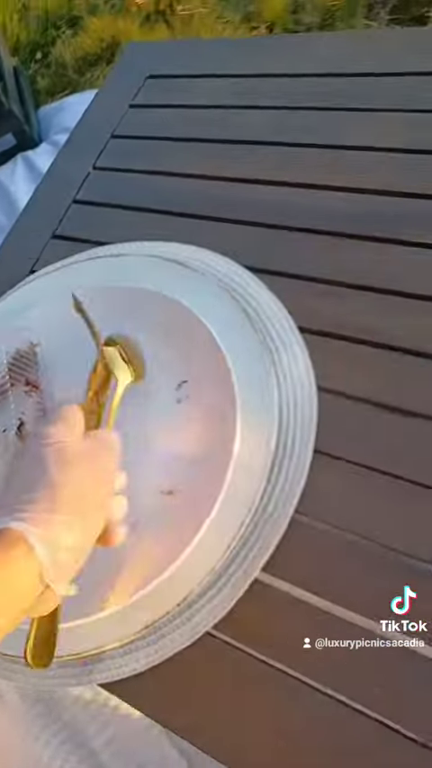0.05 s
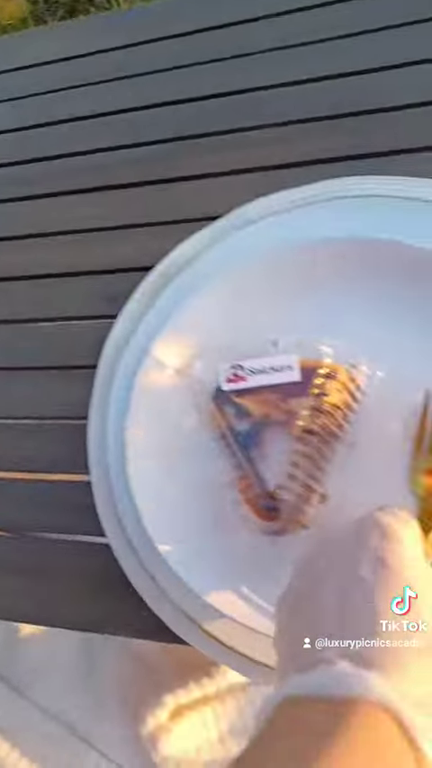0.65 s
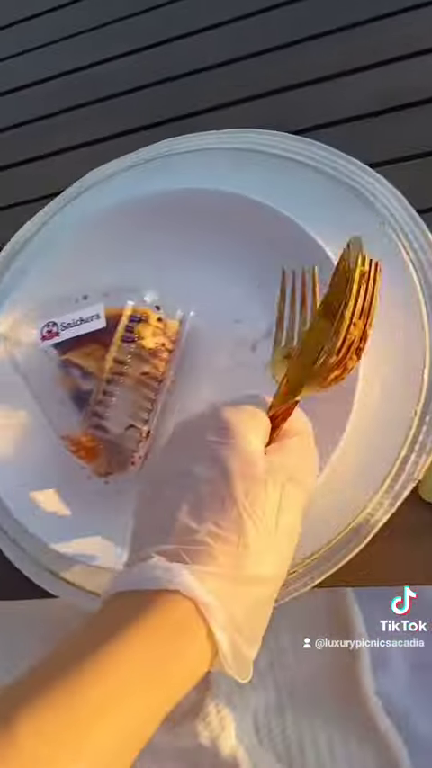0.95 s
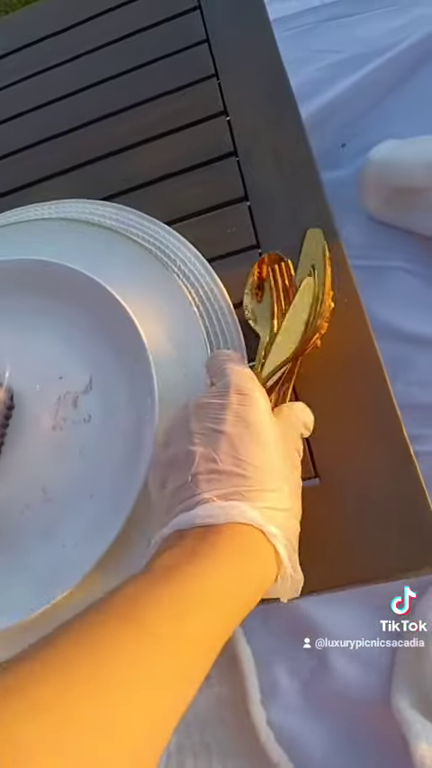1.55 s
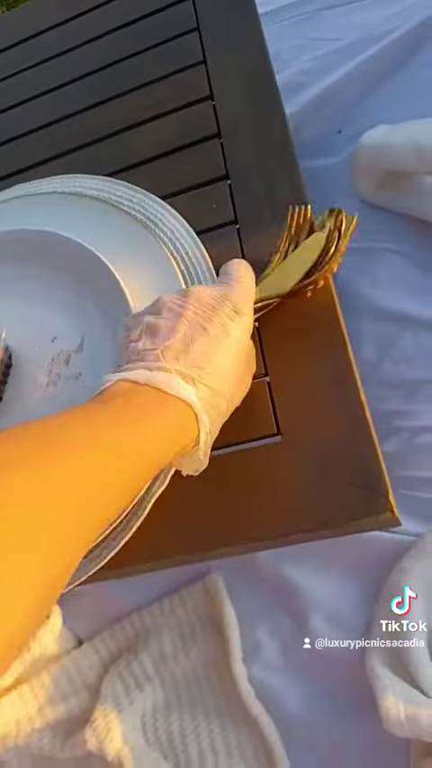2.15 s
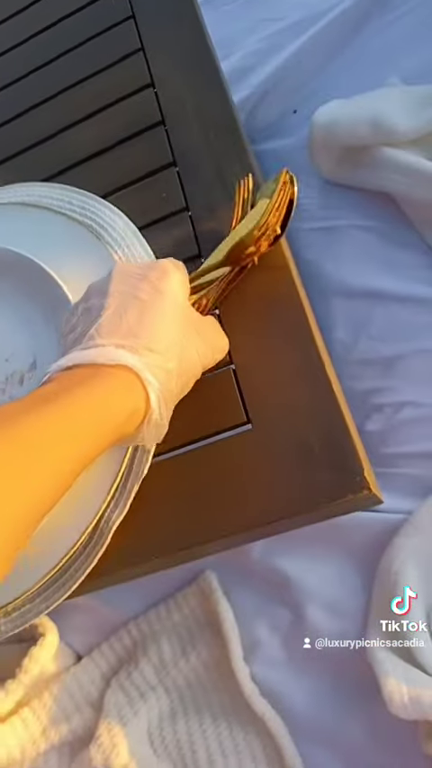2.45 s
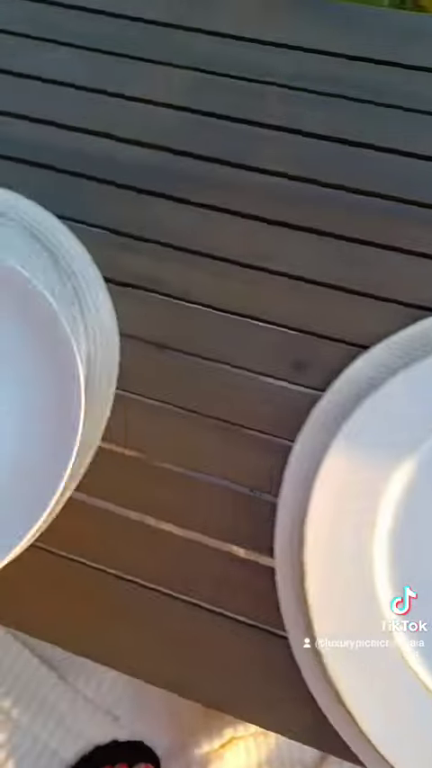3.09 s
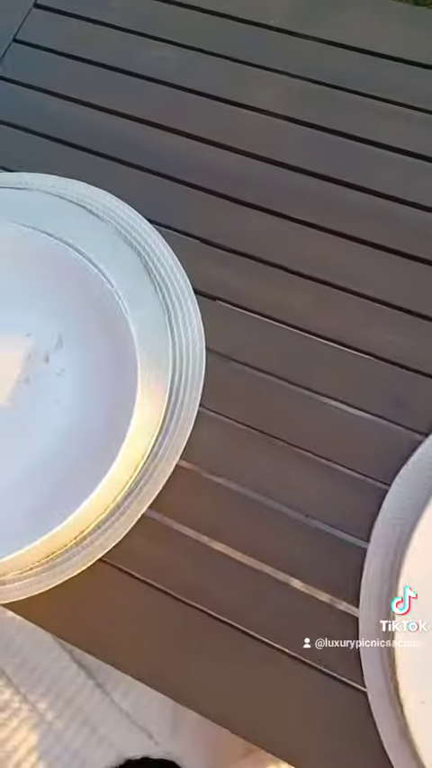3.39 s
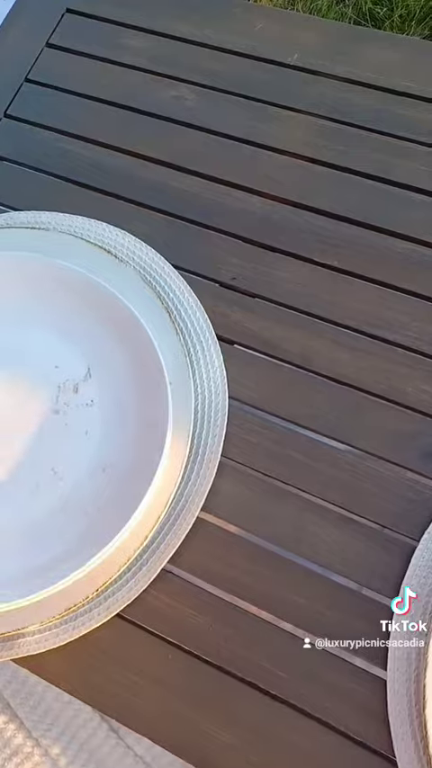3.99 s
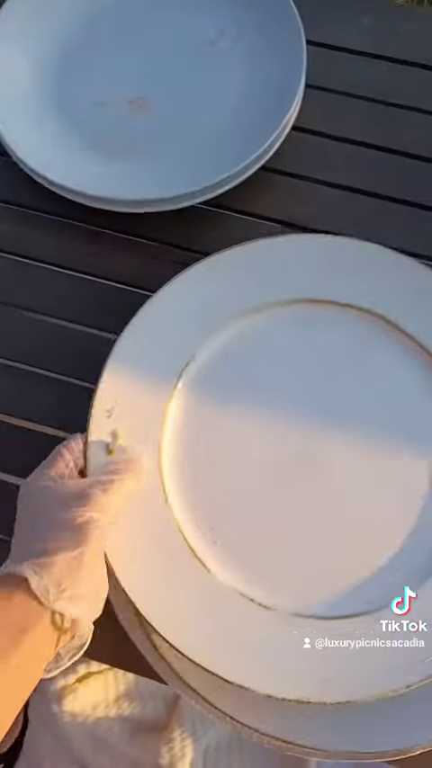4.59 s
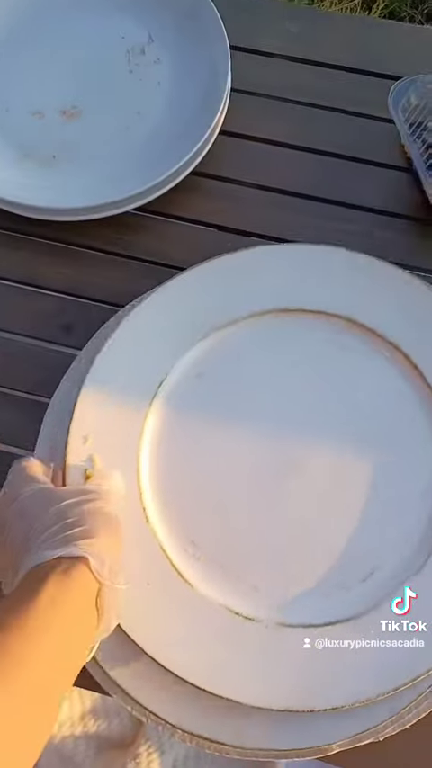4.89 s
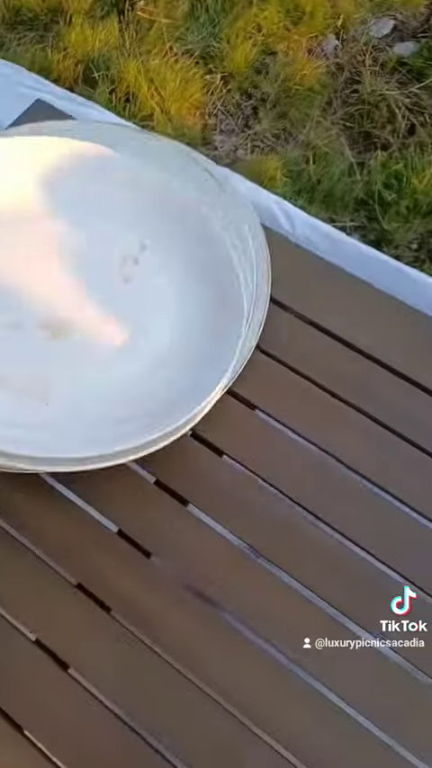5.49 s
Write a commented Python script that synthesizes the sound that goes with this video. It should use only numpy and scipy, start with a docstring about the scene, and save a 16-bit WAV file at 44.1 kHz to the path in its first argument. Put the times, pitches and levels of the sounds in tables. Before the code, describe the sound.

A brief slide and a bright fork clink open the sound, close and straight ahead, followed by small metal rattles. At about 0.7 seconds a spoon rings with a short thud from the plate and table. From 0.9 to 2.5 seconds the gathered cutlery jangles in short bursts, damped in a fist, with soft scraping over a plate, light raps and a thin knife ring near 1.5 seconds. After a short lull, china plates clatter as they are stacked from 3.2 to 3.9 seconds, loudest around 3.5, with gentle sliding. Between 4.6 and 5.1 seconds light underplates slide and knock together with a dry, hollow tone. A soft puff of wind touches the microphone at 5.2 seconds, and a last china plate lands sharply at about 5.6. The background is very quiet garden air with hardly any echo.

```python
"""A brief slide and the bright clink of a fork, close to the microphone at a garden table.
A gloved hand gathers cutlery off dinner plates: single pieces ring freely, then jangle, damped,
in the fist and scrape over a plate. China plates clatter as they are stacked, and light underplates
knock together. All of it is straight ahead, in open air with hardly any echo and a little wind."""
import sys
import numpy as np
from scipy import signal
from scipy.fft import rfft, irfft, next_fast_len
from scipy.io import wavfile
from scipy.ndimage import uniform_filter1d, map_coordinates

SR = 44100
rng = np.random.default_rng(int(sys.argv[2]) if len(sys.argv) > 2 else 0)


def to_wav(s):
    """Save 16-bit WAV."""
    ch = np.atleast_2d(s).T  # columns
    pcm = np.round(np.clip(ch, -1, 1) * 32767)  # PCM
    wavfile.write(sys.argv[1], SR, pcm.astype(np.int16))


N = 248724
TIME = np.arange(N) / SR
AGE = np.arange(SR * 3 // 4) / SR  # seconds since a blow

# Colours of garden air and of sliding on a plate. Each row: frequency in Hz, relative level in dB.
AIR_COLOUR = [(100, -13), (400, -18.5), (1500, -26.5), (5000, -25), (9000, -33), (14000, -30)]
SLIDE_BODY = [(60, -17), (130, 3), (600, -3), (1200, 3), (2200, -6.5), (8000, -34.5)]
SLIDE_HISS = [(1500, -16.5), (4000, 2.5), (8000, -6), (13000, -1.5), (17000, 6)]
# Colour of a hard contact on each material. Each row: frequency in Hz, relative level in dB.
PLASTIC = [(70, -40), (200, -3.5), (350, -9), (540, -2.5), (1300, 3), (3000, -8.5), (4800, -12.5),
           (7000, -26.5), (15500, -23)]
CERAMIC = [(200, -12), (450, -14), (800, 4), (1080, -7), (2500, 0), (8000, -14), (14000, -5)]
METAL = [(150, -19.5), (1500, -12.5), (2300, -4), (5000, -3), (8000, -13), (12500, -1), (16000, 1)]
# Crossovers in Hz between a contact's low, middle and treble.
BAND_EDGES = [1800, 7000]
# Modes of a hollow underplate and of loosely bundled cutlery.
# Each row: frequency in Hz, relative level in dB.
UNDERPLATE_MODES = [(205, 6), (545, 0), (760, 0), (1280, -1), (2250, -4)]
BUNDLE_MODES = [(4097, -6), (10201, -7), (11843, 2), (13200, 4), (14836, -8.5), (15300, 1)]
# Modes of the whole stack, one china plate, half-damped tines and each free piece of cutlery.
# Each row: frequency in Hz, relative level in dB, t60 in seconds.
STACK_MODES = [(165, -4, .09), (235, 0, .1), (300, -3, .07)]
CHINA_MODES = [(285, -19, .08), (730, -5, .13), (795, -2, .12), (1132, -12, .1), (1244, -15, .35),
               (1445, -6, .33), (1485, -5, .07), (1997, -9, .15), (2400, 0, .09), (2500, -2, .11),
               (3025, -9, .14), (3750, -4, .12), (5100, -14, .15), (5662, -12, .15), (6170, -15, .12),
               (4080, -12, .12), (8630, -13, .15), (10710, -11.5, .12), (12620, -10, .14)]
TINE_MODES = [(4468, -1, .1), (4827, 0, .06), (4931, -1, .06)]
FORK_MODES = [(646, -24, .42), (1405, -16, .3), (2180, -19, .3), (2417, 3, .1), (3040, -6, .12),
              (3830, -5, .1), (5070, -4, .16), (5790, -7, .1), (6589, -6, .17), (8021, -4, .15),
              (10360, 1, .15), (10620, 1, .1), (13000, 2, .18)]
SPOON_MODES = [(1244, -13, .18), (1986, -30, 1.3), (2853, 0, .21), (3900, 0, .1), (4996, -4, .15),
               (6182, -1, .14), (7572, 3, .13), (7950, -4, .11), (8420, 0, .09), (9056, -3, .18),
               (10450, -2, .12), (10675, -1, .15)]
KNIFE_MODES = [(3310, -9, 0.28), (4097, -11, 0.7), (6425, -23, 0.77), (7920, -10.5, 0.56), (11870, -11, .3),
               (12615, 12.5, 0.18), (14630, -5, .15)]

# Wind on the microphone. Each row: time in seconds, level in dB.
GUSTS = [(2.75, -70), (2.95, -64.5), (3.1, -69.5), (5.1, -72.5), (5.22, -47), (5.33, -66.5)]
# Strokes over a plate. Each row: start and end in seconds, body and hiss levels in dB.
SLIDES = [(0, .06, -47.5, -49), (.87, 1.17, -64, -57), (1.367, 1.52, -45, -52), (1.5, 2.1, -47.5, -55),
          (2.02, 2.67, -57, -54), (2.165, 2.26, -46, -55), (3.28, 4.02, -56, -55), (4.58, 5.07, -53, -51),
          (5.01, 5.065, -35, -44)]
# Dry knocks on underplates. Each row: start in seconds, level and brightness in dB, favoured pitch in Hz.
KNOCKS = [(.6665, -19, -25, 1500), (4.571, -21, 3, 560), (4.618, -25, -1, 600), (4.65, -31, -18, 400),
          (4.761, -19.5, -12, 690), (4.794, -38, -6, 1000), (4.86, -31, -25, 700), (4.9035, -26, -16, 830),
          (5.0, -28, 3, 1000), (5.034, -16, -16, 1350)]
# Handles and rims rap on an underplate; china lands on china.
# Each row: start in seconds, level in dB, brightness in dB.
RAPS = [(1.452, -37.5, -20), (1.876, -33, -7), (1.937, -33.5, 3), (2.012, -37.5, -13), (2.178, -34, -21),
        (3.86, -44, 1), (5.564, -35, 19), (5.632, -30, 11)]
CLATTERS = [(3.232, -16.5, 2.5), (3.476, -7.5, -32), (3.557, -13, -4), (3.623, -15, -7), (3.7333, -22, -58),
            (3.881, -40, -34), (5.577, -23, -25), (5.594, -8, -15), (5.6035, -14, -45)]
# A plate's weight settles on the stack. Each row: start in seconds, level in dB.
STACK_THUDS = [(3.236, -26), (4.65, -29), (5.568, -30)]
# Pieces chatter in the fist. Each row: start in seconds, treble level in dB, length in seconds.
JANGLES = [(.0513, -18, .016), (.132, -35, .008), (.158, -20, .008), (.218, -33, .012), (.2435, -15, .008),
           (.7565, -24, .006), (.879, -29, .006), (.887, -25, .012), (.9468, -22, .028), (1.011, -39, .022),
           (1.058, -24, .035), (1.076, -17, .02), (1.087, -15, .03), (1.106, -19, .03), (1.197, -43, .02),
           (1.387, -33, .008), (1.592, -23, .05), (1.667, -31, .012), (1.727, -25, .02), (1.776, -18, .04),
           (1.862, -25, .02), (1.877, -20, .015), (1.997, -25, .008), (2.052, -35, .005),
           (2.168, -29, .008), (2.18, -22, .02), (2.319, -26, .03), (2.39, -25.5, .02), (2.44, -24, .025),
           (2.479, -14.5, .01), (2.533, -32, .008)]
# The loose bundle rings; tines catch on each other. Each row: start in seconds, level in dB.
BUNDLE_CLINKS = [(1.593, -23), (1.725, -27.5), (1.774, -25.5), (1.847, -23.5), (1.875, -28)]
TINE_CLINKS = [(2.319, -33), (2.39, -37), (2.44, -28), (2.479, -24)]
# One piece rings freely. Each row: start in seconds, ring level in dB, crack level in dB.
FORK_CLINKS = [(0.072, -16.5, -10.5)]
SPOON_CLINKS = [(.635, -34, -29), (.6665, -16, -9), (.7565, -36, -27)]
KNIFE_CLINKS = [(1.522, -22.5, -30)]
# The level dips briefly. Each entry: start in seconds.
DIPS = [2.662, 4.022, 5.061]


def amp(db):
    """Decibels to gain."""
    return 10 ** (np.asarray(db) / 20)


def unit(x):
    """Scale to rms 1."""
    return x / np.sqrt(np.mean(x ** 2) + 1e-20)


def crest(x):
    """Scale so that the loudest few milliseconds have rms 1."""
    return x / np.sqrt(uniform_filter1d(x ** 2, size=128).max() + 1e-20)


def fade(t60):
    """Free decay after a blow, 60 dB down in t60 seconds."""
    return np.exp(-np.log(1000) * AGE / t60)


def gain_at(colour, hz):
    """Gain of a (Hz, dB) colour, read on a log axis."""
    points, db = np.transpose(colour)
    return amp(np.interp(np.log(hz + 1), np.log(points), db))


def noise(colour, count):
    """Coloured noise of rms 1."""
    size = next_fast_len(count)
    spectrum = rfft(rng.standard_normal(size)) * gain_at(colour, np.fft.rfftfreq(size, 1 / SR))
    return unit(irfft(spectrum, size)[:count])


def wobble(rate):
    """A smooth random curve, rate knots a second."""
    return map_coordinates(rng.standard_normal(int(N * rate / SR) + 4), [TIME * rate])


def add(track, start, sound):
    """Mix a sound in at start seconds."""
    room = track[round(start * SR):][:len(sound)]
    room += sound[:len(room)]


def ring(modes, spread_db=1.5):
    """Damped modes; each blow lands elsewhere and gives them new strengths."""
    draws = spread_db * rng.standard_normal((len(modes), 2))
    return crest(sum(amp(db + offset_db) * np.sign(polarity) * fade(t60) * np.sin(2 * np.pi * hz * AGE)
                     for (hz, db, t60), (offset_db, polarity) in zip(modes, draws)))


def mistuned(modes, t60, spread=.033):
    """A similar object rings, damped and a little out of tune."""
    return ring([(hz * (1 + spread * rng.standard_normal()), db, t60) for hz, db, *_ in modes])


def ring_at(modes, blows):
    """One object rings anew at every blow."""
    out = np.zeros(N)
    for start, db in blows:
        add(out, start, amp(db) * ring(modes))
    return out


def pile_modes(colour, t60, shortening, count=200):
    """The many modes of a pile, one per row; t60 holds at 1 kHz and higher ones die sooner."""
    place = (np.arange(count) + rng.random(count)) / count
    freqs = np.interp(place, [0, 1], np.sqrt([colour[0][0], colour[-1][0]])) ** 2
    lives = t60 * (freqs / 1000) ** -shortening
    gains = gain_at(colour, freqs) * freqs ** .25  # sparser modes each carry more energy
    return np.array([gain * fade(life) * np.sin(2 * np.pi * hz * AGE)
                     for hz, gain, life in zip(freqs, gains, lives)])


def strike_pile(modes):
    """One blow wakes a pile's modes at random strengths."""
    return crest(rng.standard_normal(len(modes)) @ modes)


def chatter(blow, length_s, rebound, count):
    """One blow followed by smaller, irregular rebounds."""
    out = blow.copy()
    for k, (jitter, size) in enumerate(rng.random((count, 2))):
        add(out, length_s * (k + jitter) / count, rebound * (.5 + size) * (-1) ** k * blow)
    return out


def contact(sound, treble_db, middle_db, low_db):
    """The hardness and place of a contact set how much treble, middle and low it wakes."""
    out = 0
    for edge, db in zip(BAND_EDGES, (low_db, middle_db)):
        band = signal.sosfilt(signal.butter(3, edge, "low", fs=SR, output="sos"), sound)
        sound = signal.sosfilt(signal.butter(3, edge, "high", fs=SR, output="sos"), sound)
        out = out + amp(db) * crest(band)
    return out + amp(treble_db) * crest(sound)


def struck(sound, db, bright_db, middle_db, follows):
    """Harder is brighter: the treble rises by bright_db and the middle follows part of the way."""
    return contact(sound, db + bright_db, db + middle_db + follows * bright_db, db)


def garden(air_db=-75):
    """Quiet open air, with soft puffs of wind on the microphone."""
    rumble = noise([(25, -18), (100, 7.5), (200, -9), (3000, -86.5)], N)
    air = amp(air_db) * noise(AIR_COLOUR, N)
    wind_db = np.interp(TIME, *np.transpose(GUSTS)) + .67 * wobble(36)
    return air + amp(wind_db) * rumble


def scatter(near, early_db=-24, early_t60=.09, late_db=-35, late_t60=.45):
    """Each side of the microphone hears its own faint scatter from the table and the garden."""
    tails = sum(amp(db) * unit(fade(t60) * rng.standard_normal((2, len(AGE))))
                for db, t60 in [(early_db, early_t60), (late_db, late_t60)])
    return signal.fftconvolve(near[None], tails / np.sqrt(len(AGE)), axes=1)[:, :N]


def slides(attack_s=.014, hold_share=.68, ease_body_db=-16, ease_hiss_db=-12):
    """Sliding catches on tiny bumps that roughen a plate's tone and hiss; then the hand eases off."""
    grit = unit(amp(2.5 * wobble(300) + 2 * wobble(54)))
    body, hiss = noise(SLIDE_BODY, N), noise(SLIDE_HISS, N)
    out = np.zeros(N)
    for start, end, body_db, hiss_db in SLIDES:
        moving = np.clip((TIME - start) / attack_s, 0, 1) * (TIME < end)
        eased = np.interp((TIME - start) / (end - start), [hold_share, 1], [0, 1])
        out += moving * amp(body_db + ease_body_db * eased) * body
        out += moving * amp(hiss_db + ease_hiss_db * eased) * hiss
    return grit * out


def table_thump(start_s=.668, level_db=-8):
    """Plate and table top give a short thud under the spoon."""
    return ring_at([(115, 0, .06), (225, 1, .045), (310, -5, .025)], [(start_s, level_db)])


def underplates(tick_db=-3, tick_t60=.04, ring_t60=.06, focus_db_per_octave=-9):
    """Knocks wake an underplate's hollow modes near a favoured pitch; hard edges only rap on it."""
    def tick():
        return crest(noise(PLASTIC, len(AGE)) * fade(tick_t60))

    out = np.zeros(N)
    for start, db, bright_db, pitch in KNOCKS:
        hollow = ring([(hz, mode_db + focus_db_per_octave * abs(np.log2(hz / pitch)), ring_t60)
                       for hz, mode_db in UNDERPLATE_MODES])
        add(out, start, struck(hollow + amp(tick_db) * tick(), db, bright_db, middle_db=-4, follows=.12))
    for start, db, bright_db in RAPS:
        add(out, start, struck(tick(), db, bright_db, middle_db=12.5, follows=.35))
    return out


def china_plates(crack_db=-1, crack_t60=.1, under_db=-4, rock_s=.0145, rock_s_per_db=.00033):
    """A china plate lands, chatters on its rim and rocks once; the plate under it answers."""
    out = np.zeros(N)
    for start, db, bright_db in CLATTERS:
        # The other rim comes down weaker and duller, and later after a dull landing.
        rock = (start + rock_s - rock_s_per_db * bright_db, db - 6, bright_db - 3)
        for when, blow_db, blow_bright_db in [(start, db, bright_db), rock]:
            burst = noise(CERAMIC, len(AGE)) * fade(crack_t60)
            crack = crest(chatter(burst, length_s=.014, rebound=.25, count=4))
            body = ring(CHINA_MODES) + amp(under_db) * mistuned(CHINA_MODES, t60=.06)
            clatter = body + amp(crack_db) * crack
            add(out, when, struck(clatter, blow_db, blow_bright_db, middle_db=4.5, follows=.28))
    return out


def jangle_contacts(gap_s=.0115, settle_db=-20, most=4):
    """(seconds, dB) of each contact: the main blow, then ever weaker steps as the pieces settle."""
    return [(start + after, db + settle_db * after / length)
            for start, db, length in JANGLES
            for after in gap_s * np.arange(most) if after < length]


def jangles(firm_treble_db=-19, firm_middle_db=-30, middle_follows=.7):
    """Pieces rattle against each other while the hand damps them; harder blows are brighter."""
    modes = pile_modes(METAL, t60=.034, shortening=.076)
    out = np.zeros(N)
    for start, treble_db in jangle_contacts():
        middle_db = firm_middle_db + middle_follows * (treble_db - firm_treble_db)
        rattle = chatter(strike_pile(modes), length_s=.0091, rebound=.38, count=5)
        add(out, start, contact(rattle, treble_db, middle_db, low_db=middle_db - 17))
    return out


def bundle(t60=.11):
    """Before the fist closes, the gathered pieces can still ring; later only the tines do."""
    loose = ring_at([(hz, db, t60) for hz, db in BUNDLE_MODES], BUNDLE_CLINKS)
    return loose + ring_at(TINE_MODES, TINE_CLINKS)


def clinks(modes, blows, crack_t60, attack_s):
    """A loose piece is struck: a bright crack, then its clear modes."""
    out = np.zeros(N)
    for start, ring_db, crack_db in blows:
        crack = crest(noise(METAL, len(AGE)) * fade(crack_t60))
        tones = crest(ring(modes) * (1 - np.exp(-AGE / attack_s)))
        add(out, start, amp(ring_db) * tones + amp(crack_db) * crack)
    return out


def scene():
    """The table is close and straight ahead of the microphone, so both channels are nearly the same."""
    fork = clinks(FORK_MODES, FORK_CLINKS, crack_t60=.065, attack_s=.00041)
    spoon = clinks(SPOON_MODES, SPOON_CLINKS, crack_t60=.088, attack_s=.0011)
    knife = clinks(KNIFE_MODES, KNIFE_CLINKS, crack_t60=.04, attack_s=.0051)  # rubbed, so its tone swells
    cutlery = fork + spoon + knife + bundle() + jangles() + table_thump()
    dishes = china_plates() + underplates() + ring_at(STACK_MODES, STACK_THUDS)
    near = cutlery + dishes + slides()
    return near + scatter(near) + garden()


def record(dry, dip_db=-22, dip_s=.03, low_cut_hz=75, top_hz=15500):
    """Three brief level dips, a low cut, a ceiling at full scale and a steep band limit."""
    in_dip = sum((TIME > start) & (TIME < start + dip_s) for start in DIPS)
    dipped = dry * amp(dip_db * uniform_filter1d(in_dip.astype(float), size=96))
    low_cut = signal.butter(2, low_cut_hz, "high", fs=SR, output="sos")
    limited = np.clip(signal.sosfilt(low_cut, dipped), -1, 1)
    hz = np.fft.rfftfreq(N, 1 / SR)
    return irfft(rfft(limited) / np.sqrt(1 + (hz / top_hz) ** 160), N)


dry = scene()
out = record(dry)
to_wav(out)
```